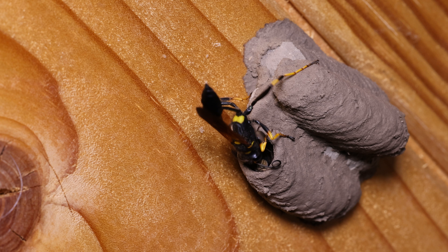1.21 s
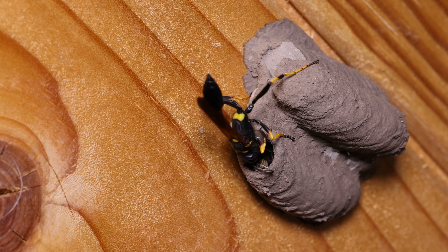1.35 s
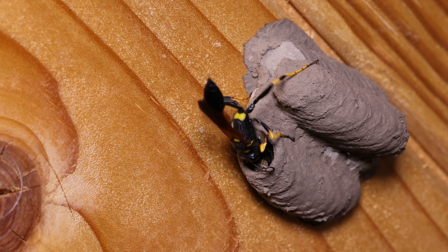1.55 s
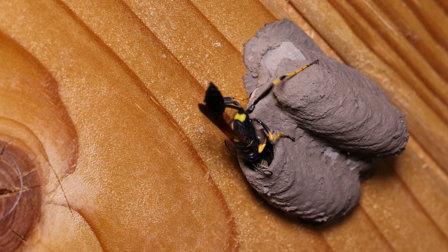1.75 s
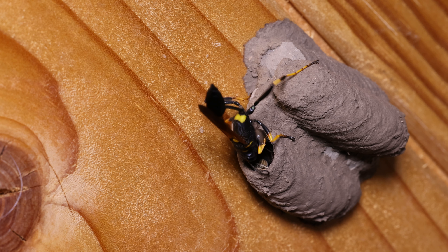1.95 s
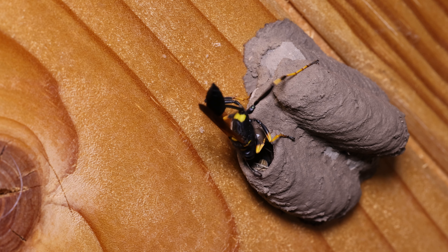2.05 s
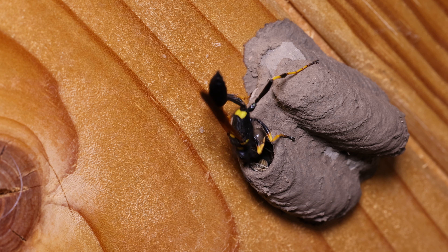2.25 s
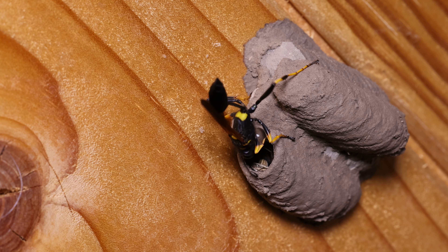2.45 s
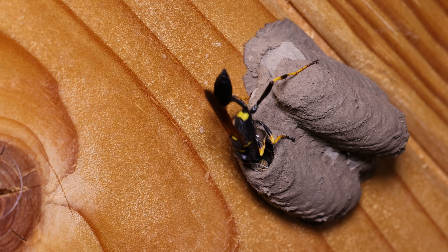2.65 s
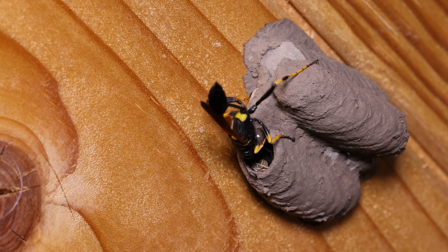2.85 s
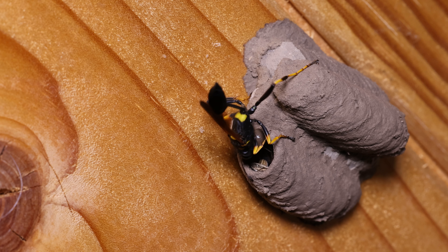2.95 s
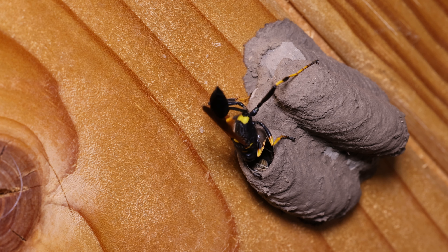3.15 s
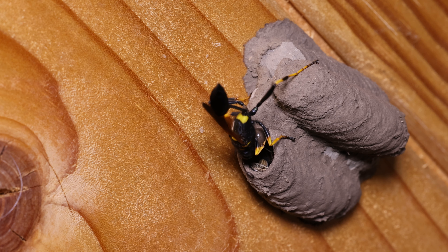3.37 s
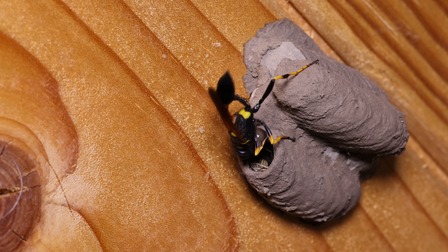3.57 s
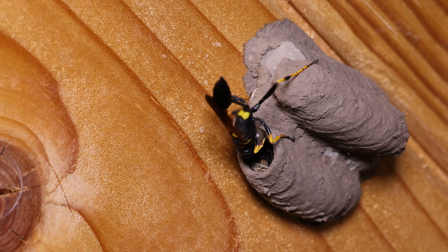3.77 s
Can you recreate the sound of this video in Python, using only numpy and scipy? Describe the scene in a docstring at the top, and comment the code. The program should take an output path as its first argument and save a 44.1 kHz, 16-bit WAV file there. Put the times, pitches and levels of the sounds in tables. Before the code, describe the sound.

A wasp buzzes close by as it works mud into its nest. The thin, nasal buzz keeps sagging and rising in pitch, turning raspier and brighter in the second half, over a steady hiss and a faint whine.

```python
"""A wasp working mud

A wasp works wet mud into its nest, buzzing its flight muscles without a pause.
The pitch sags each time it bears down. The nest hums, mostly on odd harmonics (multiples of the pitch),
and the jaws rattle and rasp on the mud. Behind it are a steady hiss and a faint whine.
Two rows of notches (narrow cuts in the spectrum) hollow out the whole sound."""
import sys
import numpy as np
from scipy import signal
from scipy.fft import rfft, irfft, next_fast_len
from scipy.io import wavfile

SR = 44100
rng = np.random.default_rng(int(sys.argv[2]) if len(sys.argv) > 2 else 0)


def to_wav(sig):
    """Store sig (one row per channel, or 1-D mono) as 16-bit WAV at the path in sys.argv[1].

    Samples outside -1..1 are clipped; the rate is SR.
    """
    pcm = np.clip(np.atleast_2d(sig), -1, 1) * 32767
    pcm = np.round(pcm).astype(np.int16)
    wavfile.write(sys.argv[1], SR, pcm.T)  # frames by channels


N = 168021
TIME = np.arange(N) / SR

# tone colour of the hiss: f/Hz, relative level/dB
HISS_SPECTRUM = [(20, -21), (70, -44), (140, -25), (230, -18.5), (350, -7.5), (500, 2.5), (660, 4.5),
                 (800, 1.5), (1100, -6.5), (1350, 3), (1900, -2), (2400, -2), (3300, -0.5), (4300, 2),
                 (5400, 0.5), (6500, 2.5), (8000, -2.5), (10000, -7.5), (12000, -13.5), (14000, -26),
                 (15700, -24)]
# thin tones of the whine: f/Hz, level/dB
WHINE_TONES = [(1352, -59), (1653, -56.5), (2444.5, -56), (3230, -59.5), (6111, -68)]
# tone colour of the gritty mud: f/Hz, relative level/dB
RASP_SPECTRUM = [(200, -23.5), (700, -5.5), (1250, -13), (2400, 6), (3000, -2), (4000, -2), (4400, 0),
                 (5400, 9), (6000, 5), (8500, 0), (11000, -7), (14500, -17)]
# steady rattle of the jaws: t/s, relative level/dB
RATTLE_LEVEL = [(.2, -61), (.58, -52.5), (.65, -47.5), (.85, -53.5), (.92, -49.5), (1.27, -53), (1.6, -52),
                (2.05, -45), (2.2, -46), (2.33, -47), (2.39, -54.5), (2.46, -40), (2.54, -37), (2.62, -42),
                (2.72, -40), (2.79, -53), (2.85, -46.5), (3.07, -40.5), (3.17, -48), (3.37, -44.5),
                (3.6, -39), (3.69, -47.5), (3.8, -46.5)]
# brief scrapes as the jaws bite in or let go: t/s, half length/s, relative level/dB
JAW_SCRAPES = [(0.277, 0.013, -45.5), (0.785, 0.025, -46), (1.411, 0.024, -41.5), (1.516, 0.028, -43),
               (1.914, 0.026, -41.5), (2.02, 0.0086, -40), (2.322, 0.032, -38.5), (3.086, 0.018, -35),
               (3.267, 0.046, -41.5), (3.596, 0.029, -48)]
# the rattle's bright ring: f/Hz, gain/dB
BRIGHT_SPECTRUM = [(3700, -49), (4650, -5), (4930, 1), (5170, -2), (5400, 0), (5500, 7), (5650, -10),
                   (5850, -16), (7200, -14), (10000, -26.5), (13000, -47)]
# strength of the reedy ring against the bright one: t/s, gain/dB
REEDY_GAIN = [(.3, 1), (.7, 7.5), (.95, 1.5), (1.42, 2.5), (2.08, 2), (2.22, 7), (2.32, 2), (2.55, 1),
              (2.62, 1), (3.02, 3), (3.08, 1), (3.6, 2.5)]
# the rattle's nasal ring: t/s, relative level/dB
NASAL_LEVEL = [(.2, -64), (.58, -54), (.65, -50), (.79, -47), (.84, -54.5), (1.12, -55), (1.33, -60),
               (1.41, -45), (1.58, -52), (1.8, -60), (1.93, -43.5), (2.04, -54), (2.33, -47.5), (2.39, -52),
               (2.68, -47), (2.74, -44.5), (2.79, -53), (2.92, -52.5), (3.09, -44), (3.18, -48),
               (3.3, -51.5), (3.53, -46.5), (3.6, -40), (3.66, -46), (3.8, -51.5)]
# the nasal ring's centre moves with the grip: t/s, f/Hz
NASAL_HZ = [(.78, 3369), (1.15, 3225), (1.42, 3302), (2.72, 3189), (3.17, 3270), (3.55, 3228)]
# the broad body under the nasal ring: f/Hz, gain/dB
BODY_SPECTRUM = [(2000, -11), (2220, -2), (2500, -4.5), (2730, -1.5), (3050, -8.5), (3700, -3.5),
                 (4200, -24)]
# how strongly the nest answers each frequency: f/Hz, gain/dB
NEST_SPECTRUM = [(400, -35), (560, -0.5), (630, 6.5), (656, 1.5), (685, -2.5), (750, -5), (1130, -23.5),
                 (1250, -2.5), (1370, 1.5), (1650, 6), (1750, 4.5), (2000, -2), (2210, -2), (2400, -19)]
# the nest's hum: t/s, relative level/dB
HUM_LEVEL = [(.2, -86), (.42, -50), (.69, -44.5), (.78, -47), (.85, -57), (.92, -48.5), (1.08, -47),
             (1.35, -42), (1.39, -53), (1.44, -42.5), (1.48, -56), (1.57, -41), (1.85, -44), (1.97, -51.5),
             (2.09, -41.5), (2.27, -44), (2.39, -53.5), (2.46, -47), (2.62, -44), (2.8, -50), (2.96, -41),
             (3.07, -45.5), (3.18, -51), (3.27, -43), (3.6, -43.5), (3.67, -48.5), (3.72, -51),
             (3.742, -36.5), (3.762, -51), (3.785, -40)]
# even harmonics against odd ones, mostly weak in the early buzzes and fuller later: t/s, gain/dB
EVEN_GAIN = [(.5, -1), (.7, -13), (.9, -7.5), (1.04, -6), (1.2, -9), (1.35, -12.5), (1.45, -9), (1.6, -16),
             (1.82, -15), (1.95, -4), (2.12, -21), (2.23, 0.5), (2.47, -10), (2.6, -1.5), (3.05, -3.5),
             (3.26, -10), (3.4, -4.5), (3.8, -6.5)]
# how fast the flight muscles vibrate: t/s, f/Hz
MUSCLE_PITCH = [(0.27, 272.8), (0.424, 296), (0.451, 272.2), (0.499, 286.7), (0.535, 270.5), (0.589, 264),
                (0.619, 281.4), (0.657, 284), (0.7, 280.8), (0.713, 274.2), (0.781, 282), (0.802, 307.4),
                (0.925, 272.5), (0.995, 271.1), (1.11, 244.8), (1.165, 244.2), (1.205, 232.6),
                (1.32, 232.6), (1.36, 241.3), (1.381, 269.1), (1.412, 280.1), (1.445, 275.4),
                (1.477, 295.3), (1.509, 288.9), (1.567, 226.3), (1.628, 225.2), (1.64, 216.8),
                (1.695, 219.1), (1.735, 237.2), (1.772, 226), (1.837, 232.5), (1.9, 273.7), (1.98, 289.9),
                (2.011, 282.6), (2.041, 242.9), (2.151, 234.5), (2.189, 243.5), (2.247, 242.9),
                (2.292, 253.5), (2.368, 298.2), (2.45, 285.2), (2.52, 263.2), (2.6, 248.8), (2.64, 252.6),
                (2.69, 251.3), (2.715, 286.2), (2.765, 293.7), (2.84, 284.7), (2.876, 255.4), (2.975, 242),
                (3.068, 254.2), (3.111, 293.2), (3.163, 307.7), (3.214, 304), (3.252, 274.2), (3.31, 247.8),
                (3.373, 241.2), (3.455, 246.2), (3.616, 248.2), (3.638, 278), (3.696, 303.4),
                (3.734, 280.4), (3.803, 222.8)]
# rows of notches: spacing/Hz, width/Hz, share by which the last is narrower, first gain/dB, last gain/dB
NOTCH_ROWS = [(142.64, 98.4, 0.35, -52, -26), (954, 401, 0.68, -52, -17)]


def amp(db):
    """Turns decibels into a factor to multiply by."""
    return 10 ** (np.asarray(db) / 20)


def unit(x):
    """Scales a signal to an average strength (rms) of 1."""
    return x / np.sqrt(np.mean(abs(x) ** 2) + 1e-20)


def curve(table):
    """A time table's value at every sample."""
    return np.interp(TIME, *np.transpose(table))


def response(table, hz):
    """Gain of a spectrum at the given frequencies."""
    f, db = np.transpose(table)
    return amp(np.interp(np.log(hz + 1), np.log(f), db))


def colour(x, table):
    """Gives a signal the table's tone colour, at strength 1."""
    size = next_fast_len(N)
    gain = response(table, np.fft.rfftfreq(size, 1 / SR))
    return unit(irfft(rfft(x, size) * gain, size)[..., :N])


def drift(rate_hz, count=4096):
    """A smooth random wobble, mostly slower than rate_hz; complex, so it can shake level and phase."""
    f = np.fft.fftfreq(count, TIME[-1] / count)
    spectrum = np.exp(2j * np.pi * rng.random(count)) / np.sqrt(1 + (f / rate_hz) ** 4)
    return np.interp(TIME, np.linspace(0, TIME[-1], count), unit(np.fft.ifft(spectrum)))


def background(hiss_db=-41, waver=0.31):
    """A steady hiss and a few thin, wavering tones."""
    whine = 0
    for hz, db in WHINE_TONES:
        tone = np.exp(2j * np.pi * hz * TIME) * (1 + waver * drift(rate_hz=8))
        whine += amp(db) * unit(tone.real)
    return amp(hiss_db) * colour(rng.standard_normal(N), HISS_SPECTRUM) + whine


def jaw_contact():
    """How strongly the jaws touch the mud: steady rattle plus brief scrapes."""
    scrape_power = sum(amp(db) ** 2 * np.exp(-((TIME - t) / half) ** 2) for t, half, db in JAW_SCRAPES)
    return np.sqrt(amp(curve(RATTLE_LEVEL)) ** 2 + scrape_power)


def looseness(hz, firm_hz=253, loose_hz=282):
    """0 with the jaws held firm at low pitch, 1 when they sit loosely at high pitch."""
    return np.clip((hz - firm_hz) / (loose_hz - firm_hz), 0, 1)


def mud_rasp(cycle, level_db=-43.7, pulse=0.55, grit=0.24):
    """Grains of mud scrape in step with the vibration, more as the rattle grows."""
    pulsing_noise = rng.standard_normal(N) * (1 + pulse * cycle.real)
    grains = pulsing_noise * np.exp(grit * drift(rate_hz=90).real)
    return amp(level_db) * colour(grains, RASP_SPECTRUM) * unit(np.sqrt(jaw_contact()))


def jaw_rattle(hz, cycle, unsteady=0.33, nasal_peak_db=6, treble_db=3, middle_db=4):
    """The jaws strike once a cycle into a nasal, a reedy and a bright ring, which shift with the grip."""
    reedy_gain, nasal_hz = amp(curve(REEDY_GAIN)), curve(NASAL_HZ)
    chatter = 0.37 * np.maximum(looseness(hz), 0.45)  # loose jaws chatter more
    treble = middle = 0
    for k in range(8, 40):
        f = k * hz
        harmonic = cycle ** k * (1 + unsteady * drift(rate_hz=8) + chatter * drift(rate_hz=45))
        reedy = reedy_gain * ring(f, centre_hz=4422, width_hz=540)
        nasal = ring(f, nasal_hz, width_hz=250)
        body = response(BODY_SPECTRUM, f) * nasal / abs(nasal)  # lags just like the nasal ring
        # flipping every other harmonic moves the treble by half a cycle
        treble += ((-1) ** k * (response(BRIGHT_SPECTRUM, f) - reedy) * harmonic).real
        middle -= ((body + amp(nasal_peak_db) * nasal) * harmonic).real
    treble = unit(treble) * jaw_contact() * amp(treble_db)
    return treble + unit(middle) * amp(curve(NASAL_LEVEL) + middle_db)


def ring(hz, centre_hz, width_hz):
    """Gain and lag of something that rings only near one frequency."""
    return 1 / (1 + 2j * (hz - centre_hz) / width_hz) ** 2


def nest_hum(hz, cycle, flutter=0.21, rough=0.14, fifth_rough=0.45, eighth_db=-4.5, boost_db=4):
    """The shaken nest hums on the low harmonics, mostly the odd ones."""
    even_gain = amp(curve(EVEN_GAIN))
    hum = power = 0
    for k in range(2, 11):
        gain = response(NEST_SPECTRUM, k * hz) * (1 if k % 2 else even_gain)
        wobble = flutter * drift(rate_hz=14) + rough * even_gain * drift(rate_hz=110)
        if k == 5:  # turns rough as the wasp bears down
            wobble += fifth_rough * (1 - looseness(hz)) * drift(rate_hz=35)
        if k == 8:
            gain *= amp(eighth_db)
        hum += gain * (cycle ** k * (1 + wobble)).real
        power += gain ** 2 / 2
    return hum / np.sqrt(power) * amp(curve(HUM_LEVEL) + boost_db)


def wasp(jitter=0.0036):
    """One slightly unsteady muscle vibration drives hum, rattle and rasp."""
    hz = curve(MUSCLE_PITCH) * (1 + jitter * drift(rate_hz=45).real)
    cycle = np.exp(2j * np.pi * np.cumsum(hz) / SR)  # circles once per vibration; cycle ** k is harmonic k
    return nest_hum(hz, cycle) + jaw_rattle(hz, cycle) + mud_rasp(cycle)


def scene():
    """Wasp and background, both in the centre."""
    return np.tile(wasp() + background(), (2, 1))


def record(dry, per_row=7, cutoff_hz=15750):
    """Two rows of evenly spaced notches hollow out the sound, then the highest treble is cut off."""
    size = next_fast_len(N + SR // 4)
    f = np.fft.rfftfreq(size, 1 / SR)
    spectrum = rfft(dry, size)
    for spacing_hz, width_hz, narrowing, first_db, last_db in NOTCH_ROWS:
        for k in range(1, per_row + 1):
            along = ((k - 1) / (per_row - 1)) ** 2  # 0 at the first notch, 1 at the last
            offset = 2j * (f - k * spacing_hz) / (width_hz * (1 - narrowing * along))
            centre_gain = amp(first_db + (last_db - first_db) * along)
            spectrum *= (offset + centre_gain) / (offset + 1)
    hollow = irfft(spectrum, size)[:, :N]
    lowpass = signal.firwin(511, cutoff_hz, window=("kaiser", 9), fs=SR)
    return signal.oaconvolve(hollow, lowpass[None], "same")


dry = scene()
out = record(dry)
to_wav(out)
```